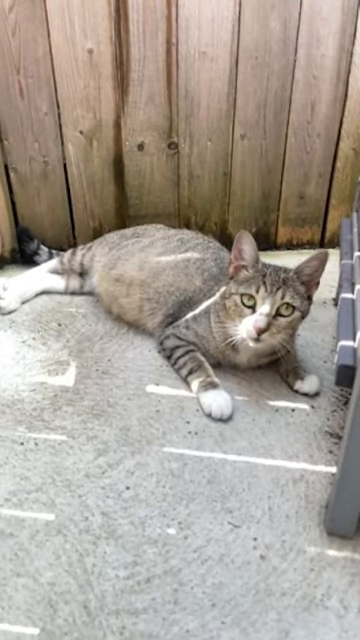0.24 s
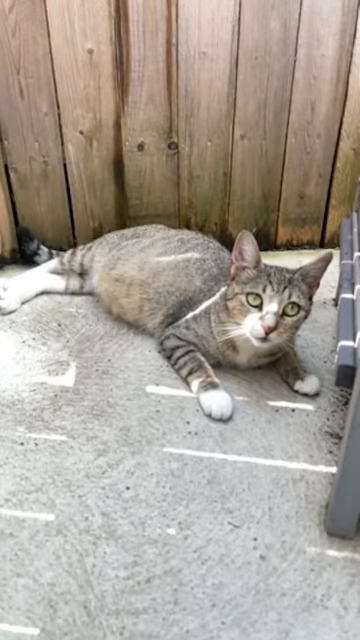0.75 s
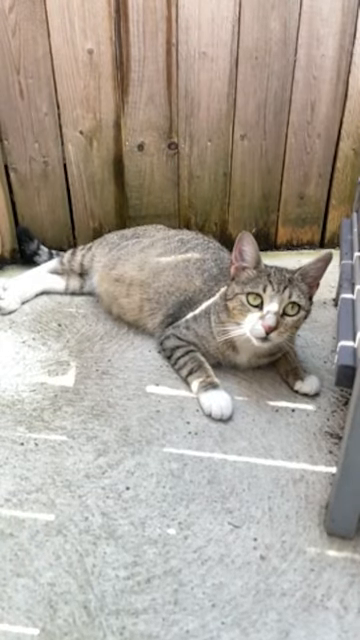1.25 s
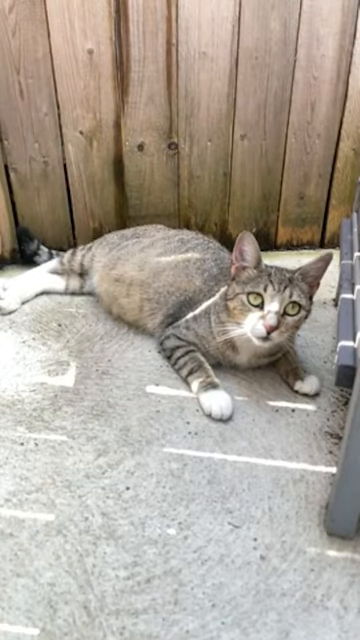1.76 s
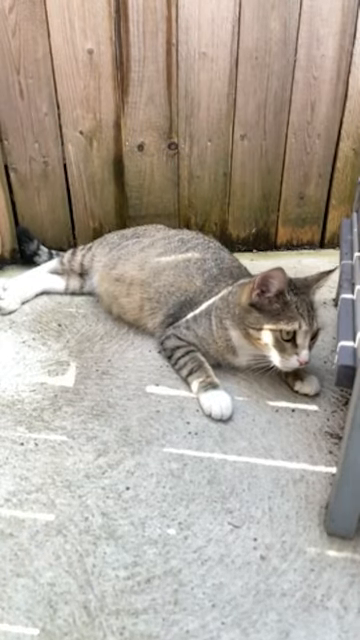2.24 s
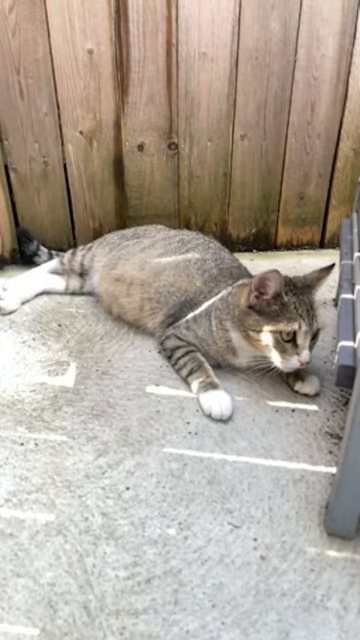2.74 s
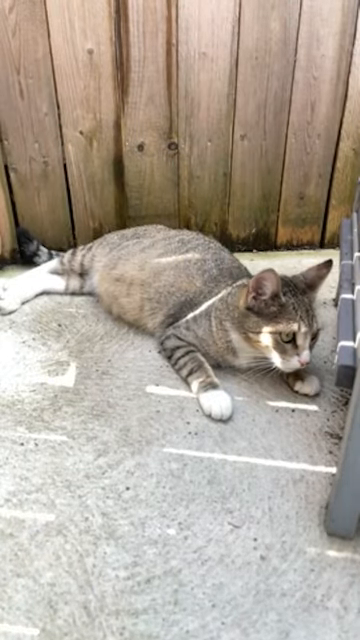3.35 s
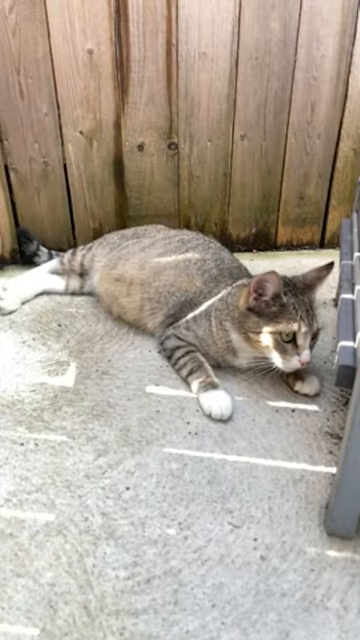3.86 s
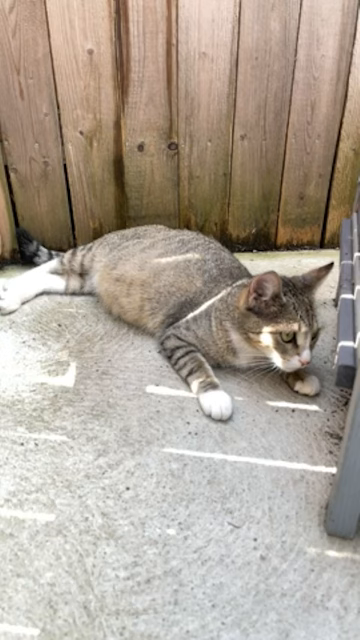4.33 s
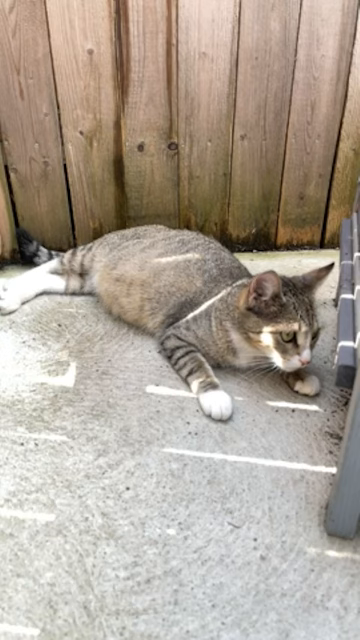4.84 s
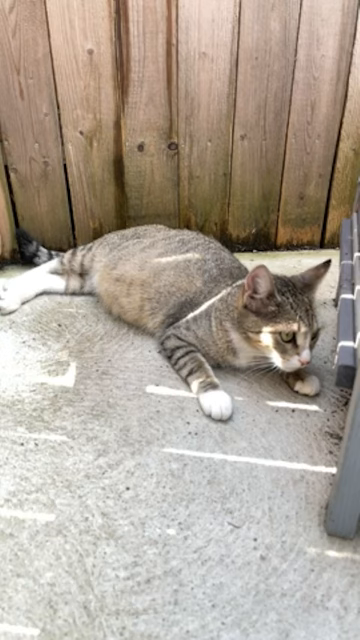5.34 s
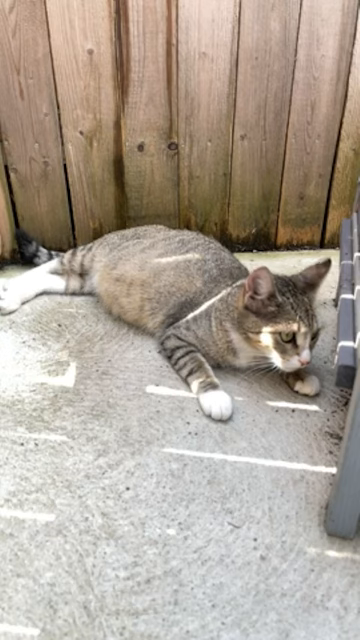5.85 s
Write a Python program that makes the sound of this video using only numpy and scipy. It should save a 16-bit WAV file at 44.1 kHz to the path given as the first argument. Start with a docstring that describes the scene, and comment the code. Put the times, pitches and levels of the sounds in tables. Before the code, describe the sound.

In a backyard, a compressor engine hums steadily while a jackhammer down the street works in three bursts, with fast cracking blows, a thin metallic ring and throbbing puffs of air. During the pause after the first burst, soft brushing, tiny squeaks, light knocks and one dry scratch sound near the microphone. A short second burst follows, and the third runs on to the end, echoing between the houses.

```python
"""What sounds like a jackhammer, a few houses from a backyard microphone, rattles in three bursts:
each blow cracks concrete, rings the steel bit and puffs out air, blurred by walls and fences.
A compressor engine drones on through the pause, over the wash of the neighbourhood.
Close to the microphone: a few soft knocks, light brushing, faint squeaks and a short dry scratch."""
import sys
import numpy as np
from scipy import signal
from scipy.fft import rfft, irfft, next_fast_len
from scipy.io import wavfile

SR = 44100
rng = np.random.default_rng(int(sys.argv[2]) if len(sys.argv) > 2 else 0)


def log_audio(samples):
    """Write samples as a 16-bit WAV file to the path given in sys.argv[1]."""
    # one column per channel
    frames = np.atleast_2d(samples).T
    # limit to full scale, then quantise
    limited = np.clip(frames, -1, 1)
    pcm = np.round(limited * 32767).astype(np.int16)
    wavfile.write(sys.argv[1], SR, pcm)


N = 268569
TIME = np.arange(N) / SR


def gain_of(db):
    """Decibels to amplitude."""
    return 10 ** (np.asarray(db) / 20)


def unit_rms(x):
    """Scales to rms 1."""
    return x / np.sqrt(np.mean(x ** 2) + 1e-20)


def at_hz(points, hz):
    """Reads a table on a log-frequency axis."""
    f, value = np.transpose(points)
    return np.interp(np.log(hz + 1), np.log(f + 1), value)


def curves(rows):
    """The columns of a time table, one value a sample."""
    s, *columns = np.transpose(rows)
    return [np.interp(TIME, s, c) for c in columns]


def add(mix, s, sound):
    """Mixes a sound in at time s."""
    part = mix[round(s * SR):][:len(sound)]
    part += sound[:len(part)]


def coloured(x, spectrum):
    """Filters x by a spectrum table, to rms 1."""
    hz = np.fft.rfftfreq(len(x), 1 / SR)
    return unit_rms(irfft(rfft(x) * gain_of(at_hz(spectrum, hz)), len(x)))


def wander(per_s):
    """Random drift of rms 1, up to about the given rate."""
    size = next_fast_len(N)
    hz = np.fft.rfftfreq(size, 1 / SR)
    lowpass = (hz > 0) * np.exp(-(hz / per_s) ** 2)
    return unit_rms(irfft(rfft(rng.standard_normal(size)) * lowpass, size)[:N])


def tone(hz, db, waver_db):
    """One low tone, wavering on its way through the air."""
    return gain_of(db + waver_db * wander(3.4)) * unit_rms(np.sin(2 * np.pi * np.cumsum(hz) / SR))


# Open air all round the backyard: f/Hz, relative level/dB
AIR_COLOUR = [(60, -41), (125, -7), (160, -8), (220, -7), (320, -12.3), (450, -18.5), (560, -21),
              (800, -26), (1050, -25.6), (1900, -30), (2700, -34.8), (5000, -37), (6000, -40),
              (7500, -38.5), (8000, -49.5), (9400, -54), (10500, -60), (15500, -52)]
def air(level_db=-47, swell_db=0.4):
    """The wash of the neighbourhood, gently swelling."""
    return gain_of(level_db - swell_db * wander(1.16)) * coloured(rng.standard_normal(N), AIR_COLOUR)


# Engine rumble from the road: f/Hz, relative level/dB
RUMBLE_COLOUR = [(20, -50), (28, -31), (36, -5.5), (50, 3), (75, -2), (115, 0), (160, -9.5), (300, -50)]
# Its firing note: t/s, f/Hz, level/dB before trim
FIRING = [(0, 56, -37), (.9, 54, -37), (1.05, 53, -45), (1.75, 55, -45), (1.9, 56.2, -36), (2.3, 57.3, -38),
          (2.8, 57, -37.5), (3.2, 55.8, -40), (3.95, 56, -37), (4.12, 57.2, -30.5), (4.6, 55.6, -37),
          (5.3, 56, -40), (5.55, 55.5, -36), (6.09, 55.5, -37)]
def compressor(rumble_db=-47, firing_trim_db=-3.2, drone_hz=100.3, drone_db=-45.2, stray_hz=.4):
    """The engine's firing note and a steady drone over a low rumble."""
    rumble = gain_of(rumble_db) * coloured(rng.standard_normal(N), RUMBLE_COLOUR)
    firing_hz, firing_db = curves(FIRING)
    drone = tone(drone_hz + stray_hz * wander(1), drone_db, waver_db=1.2)
    return tone(firing_hz, firing_db + firing_trim_db, waver_db=1.5) + drone + rumble


# Light brushing near the microphone: middle t/s, length/s, level/dB
BRUSH_STROKES = [(1.37, 0.24, -58.5), (1.42, .05, -56), (2.24, .4, -61.5), (2.485, .1, -55.5),
                 (2.765, .04, -59)]
# Its hiss: f/Hz, relative level/dB
BRUSH_COLOUR = [(1000, -10), (3300, 3), (5000, 1), (9000, -8), (11500, -8), (13500, -2), (15500, -3)]
def brushing(grain_db=2):
    """Soft, fine-grained rustles that swell and fade."""
    out = np.zeros(N)
    for s, length, db in BRUSH_STROKES:
        size = round(length * SR)
        grains = rng.standard_normal(size) * gain_of(grain_db * wander(300)[:size])
        add(out, s - length / 2, gain_of(db) * coloured(grains, BRUSH_COLOUR) * np.hanning(size))
    return out


# Faint rubs near the microphone: t/s, length/s, starting f/Hz, level/dB
RUBS = [(1.335, .05, 900, -55), (1.365, .07, 1750, -57), (1.418, .02, 3300, -53), (1.445, .04, 1350, -52),
        (1.445, .035, 2550, -52)]
def squeaks(rise_hz_per_s=13000, width_hz=420):
    """Friction in a narrow resonance that slides upward."""
    out, r = np.zeros(N), np.exp(-np.pi * width_hz / SR)
    for s, length, hz, db in RUBS:
        t = np.arange(0, length, 1 / SR)
        fuzz = signal.lfilter([1], [1, -2 * r, r * r], rng.standard_normal(SR // 5))[-len(t):]
        glide = np.sin(2 * np.pi * np.cumsum(hz + rise_hz_per_s * t) / SR)
        add(out, s, gain_of(db) * unit_rms(fuzz * glide) * np.hanning(len(t)))
    return out


def scuff(decay_s, colour, attack_s=.00034):
    """A short dying burst of friction."""
    t = np.arange(SR // 5) / SR
    noise = coloured(rng.standard_normal(len(t)), colour)
    return noise * np.exp(-t / decay_s) * (1 - np.exp(-t / attack_s))


# Knocks at close range: t/s, level/dB, decay/s, body share/dB, body pitch factor, tilt/(dB per octave)
KNOCKS = [(1.406, -57, .04, -25, 1, 0), (1.423, -53, 0.018, -16, 0.72, 0), (1.447, -51, 0.014, -20, 1, 0),
          (1.468, -43.5, 0.0078, -19, 0.92, 0), (1.836, -44.5, 0.01, -5, 1, 3.2),
          (1.84, -56, .005, 8, 1.06, 0), (1.8445, -51, 0.0073, 10, 0.95, -1.5),
          (2.046, -52, .008, 18, .9, -8), (2.053, -45.5, 0.013, -5, 0.97, 3),
          (2.762, -55, 0.018, -14, 1, 0)]
# Their contact noise: f/Hz, relative level/dB
KNOCK_COLOUR = [(200, 2), (700, -8), (1300, 0), (2700, 2), (4500, -9), (7000, -14), (10000, -25),
                (15000, -19)]
# The knocked body before pitch factor and tilt: f/Hz, relative level/dB, t60/s
KNOCK_MODES = [(332, 2.5, 0.07), (540, -0.5, 0.05), (752, 4, 0.044), (2600, -8, 0.043), (3100, -8, .05)]
def knocks():
    """Each soft contact scuffs and leaves a short hollow ring."""
    out, t = np.zeros(N), np.arange(SR // 5) / SR
    for s, db, decay_s, share_db, pitch, tilt_db in KNOCKS:
        body = np.zeros(len(t))
        for hz, mode_db, t60 in KNOCK_MODES:
            octaves = np.log2(hz / KNOCK_MODES[0][0])
            envelope = gain_of(mode_db + tilt_db * octaves - 60 * t / t60)
            body += envelope * np.sin(2 * np.pi * hz * pitch * t)
        add(out, s, gain_of(db) * (scuff(decay_s, KNOCK_COLOUR) + gain_of(share_db) * body))
    return out


# Catches of a scratch at close range: t/s, tick level/dB, ring level/dB, body level/dB, tick decay/s
CATCHES = [(2.44, -53, -57, -60, .003), (2.449, -47, -52, -60, .002), (2.4635, -42, -38, -56, .002),
           (2.469, -49, -48, -51, .003), (2.475, -40, -48, -51, .002), (2.479, -43, -56, -49, .0024),
           (2.4817, -42, -37, -49, .0016), (2.489, -51, -52, -56, .003), (2.495, -52, -47, -60, .007),
           (2.5127, -39, -55, -56, .002), (2.5145, -39, -48, -49, .003)]
# Their dry tick, bright ring and hollow body, each: f/Hz, relative level/dB
TICK_COLOUR = [(400, -15), (780, -2), (1700, -6), (2700, -11), (4500, -10), (6200, -6), (7400, -2),
               (8400, -17), (9900, -6), (11000, -9), (12500, -5), (15000, -4)]
SCRATCH_MODES = [(3150, -6), (3400, 0), (3720, -2)]
HOLLOW_COLOUR = [(400, -20), (650, 0), (790, 6), (1000, -12), (1210, 3), (1500, -14), (3000, -35)]
def scratch(detune=.015, attack_s=.0006, ring_extra_s=.0006, body_decay_s=.007):
    """Each catch ticks, rings briefly and stirs a hollow body."""
    out, t = np.zeros(N), np.arange(SR // 5) / SR
    for s, tick_db, ring_db, body_db, decay_s in CATCHES:
        ring = sum(gain_of(db) * np.sin(2 * np.pi * hz * (1 + detune * rng.standard_normal()) * t)
                   for hz, db in SCRATCH_MODES)
        ring *= np.exp(-t / (decay_s + ring_extra_s)) * (1 - np.exp(-t / attack_s))
        tick = gain_of(tick_db) * scuff(decay_s, TICK_COLOUR)
        body = gain_of(body_db) * scuff(body_decay_s, HOLLOW_COLOUR)
        add(out, s, tick + gain_of(ring_db) * ring + body)
    return out


# Reverberation of the streets and yards between hammer and microphone: f/Hz, t60/s
YARD_DECAY = [(60, 1), (300, 0.92), (1500, 1), (5000, 1), (14000, 0.51)]
def echo_path(x, early_gain, early_s):
    """A first cluster of echoes from nearby walls, then a long diffuse tail."""
    hz, t, bins = signal.stft(rng.standard_normal(SR // 2), SR, nperseg=256)
    fade = gain_of(-60 * t / at_hz(YARD_DECAY, hz)[:, None])
    tail = signal.istft(bins * fade, SR, nperseg=256)[1]
    early = rng.standard_normal(len(tail)) * np.exp(-np.arange(len(tail)) / SR / early_s)
    under_way = np.r_[x[:SR], x]  # a second of lead-in: the yards already ring at the start
    return signal.fftconvolve(under_way, unit_rms(tail) + early_gain * unit_rms(early))[SR:SR + N]


def yards(x, early_gain, early_s, drift_per_s=0.7, paths=4):
    """Moving air slowly shifts the sound from one set of echo paths to the next."""
    turn = drift_per_s * TIME + rng.random()
    shares = [np.maximum(np.cos(2 * np.pi * (turn + k / paths)), 0) for k in range(paths)]
    return sum(share * echo_path(x, early_gain, early_s) for share in shares)


# Boom between the houses: t/s, level/dB
BOOM_LEVEL = [(0, -39), (.5, -38), (.7, -45), (1.05, -41), (1.5, -46), (1.75, -62), (4, -62), (4.7, -47),
              (5.1, -43.5), (6.09, -43.5)]
def boom(hz=71.5, stray_hz=1.5):
    """A low tone that swells while the hammer works."""
    db, = curves(BOOM_LEVEL)
    return tone(hz + stray_hz * wander(8), db, waver_db=1.2)


# Exhaust tones reaching the backyard: multiple of the blow rate, relative level/dB
EXHAUST_HARMONICS = [(2, -21), (5, -7), (7, -7.5), (9, -12), (11, -14), (12, -10.5), (15, -16), (26, -20),
                     (28, -24)]
def throb(cycles, waver_db=2):
    """The regular part of the exhaust: clean multiples of the blow rate."""
    out = np.zeros(N)
    for order, db in EXHAUST_HARMONICS:
        waver = gain_of(waver_db * wander(2))
        out += gain_of(db) * unit_rms(waver * np.sin(2 * np.pi * (order * cycles + rng.random())))
    return out


# The bit shifting in its hole in the road: middle t/s, length/s, mode f/Hz, boost/dB
BIT_SHIFTS = [(.05, .1, 4850, 5), (.26, .12, 4850, 10), (.55, .35, 4850, 5), (1.03, .4, 4850, 7),
              (.7, .12, 5804, 10), (.85, .6, 9875, 6), (.93, .25, 3172, 8.5), (.95, .3, 4285, 7),
              (.7, .5, 13775, -3), (1.06, .13, 13775, 10), (1.06, .13, 8520, 8), (3.66, .2, 6235, -4),
              (3.86, .16, 4850, 6), (3.67, .18, 14348, 3), (3.67, .18, 13775, 4), (3.67, .18, 8520, 4),
              (4.15, .34, 6235, 9.5), (4.08, .1, 15100, 10), (4.22, .18, 4850, 5), (4.22, .22, 13775, 3),
              (4.22, .22, 9875, 3), (4.5, .3, 11050, -7), (4.88, .11, 4850, 2), (5.09, .56, 4850, 8.5),
              (4.86, .1, 14348, 6), (5.02, .12, 13775, 6), (5.64, .26, 4850, 6.5), (5.71, .1, 13775, 9),
              (5.75, .3, 6235, 4), (5.9, .26, 9875, 7), (5.86, .18, 8520, 6), (5.92, .3, 3172, 7),
              (6.01, .1, 5804, 9)]
def shift_gain(mode_hz):
    """As the bit shifts, one mode sings out or is held back for a moment."""
    return gain_of(sum(db / (1 + (2 * (TIME - s) / length) ** 6)  # a flat-topped swell
                       for s, length, hz, db in BIT_SHIFTS if hz == mode_hz))


def resonance(drive, hz, width_hz):
    """One lightly damped mode, kept sounding by the drive."""
    r = np.exp(-np.pi * width_hz / SR)
    return unit_rms(signal.lfilter([1, 0, -1], [1, -2 * r * np.cos(2 * np.pi * hz / SR), r * r], drive))


# The bit's weaker modes, heard from the backyard: f/Hz, level/dB before swells and burst gain
BIT_MODES = [(3172, -68), (4285, -65.5), (4960, -67), (5804, -67), (6235, -62.5), (8520, -72),
             (9875, -68.5), (11050, -72.5), (13775, -69.5), (14348, -67), (15100, -81)]
def steel_bit(drive, swell_db=1.4, singing_hz=4850, singing_db=-61, stray_hz=11, spurt_db=2.4):
    """Each mode of the steel swells and fades on its own; the strongest sings in spurts."""
    modes = np.zeros(N)
    for hz, db in BIT_MODES:
        swell = unit_rms(gain_of(swell_db * wander(2))) * shift_gain(hz)
        modes += gain_of(db) * swell * resonance(drive, hz, width_hz=25)
    pitch = singing_hz + stray_hz * (wander(15) + wander(90))
    song = unit_rms(np.sin(2 * np.pi * np.cumsum(pitch) / SR) * gain_of(spurt_db * wander(35)))
    return modes + gain_of(singing_db) * shift_gain(singing_hz) * song


# Trigger pulls out on the road: on t/s, off t/s, rise/s, strike level/dB, exhaust level/dB,
# ring gain/dB, treble lift of the first blows/dB
BURSTS = [(-1, 1.12, .19, -43, -40, -1, 0), (3.43, 3.72, .22, -48, -43.5, .5, 9),
          (3.89, 6.2, .21, -41.5, -38.2, 1, 4.5)]
# The hammer is leaned on and strikes harder: middle t/s, length/s, boost/dB
LEANS = [(1.0, .28, 1.7)]
def bursts(bite_s=.38, ring_bite_db=3.5, exhaust_fill_s=.2):
    """Each burst bites brightly, holds and dies away: first the ring, then rattle, then exhaust."""
    lift_db, strike, exhaust, ring = np.zeros((4, N))
    for start, stop, rise_s, strike_db, exhaust_db, ring_db, bite_db in BURSTS:
        age, after = np.maximum(TIME - start, 0), np.maximum(TIME - stop, 0)
        rise = np.sin(np.pi / 2 * np.minimum(age / rise_s, 1)) ** 2
        contact, rattle, airflow = (rise * gain_of(-db_per_s * after) for db_per_s in (85, 51, 44))
        bite = contact * np.exp(-(age / bite_s) ** 2)
        lift_db += bite_db * bite
        strike += gain_of(strike_db) * rattle
        exhaust += gain_of(exhaust_db) * airflow * (1 - np.exp(-age / exhaust_fill_s))
        ring += gain_of(ring_db + ring_bite_db * bite) * rise * contact
    lean_db = sum(db * np.exp(-(2 * (TIME - s) / length) ** 2) for s, length, db in LEANS)
    return lift_db, strike * gain_of(lean_db), exhaust, ring


def brightened(x, db, corner_hz=3400):
    """Lifts the treble by a curve in dB."""
    dull = signal.sosfiltfilt(signal.butter(1, corner_hz, fs=SR, output="sos"), x)
    return dull + gain_of(db) * (x - dull)


# Pace of the hammer, a few houses from the microphone: t/s, blow rate/Hz
BLOW_RATE = [(0, 19.2), (.34, 18.9), (.6, 18), (1.2, 17.7), (3.6, 17.5), (4, 19), (5.07, 19.3),
             (6.09, 18.8)]
# Strike on concrete and exhaust puff at that distance, each: f/Hz, relative level/dB
STRIKE_COLOUR = [(300, -7), (520, 0.5), (780, -3), (970, 1.8), (1250, -1.5), (1800, 1), (2700, -5.2),
                 (3750, -8.6), (5000, -4.8), (5700, -9), (7200, -6.5), (8000, -16), (9700, -18),
                 (10600, -22), (12300, -23), (14200, -18.5), (15500, -22)]
EXHAUST_COLOUR = [(28, -39), (45, -6), (55, -14.5), (72, -3), (82, -2), (93, 2), (130, 4), (165, 0),
                  (197, -2.5), (231, 3), (262, -2), (320, -2.5), (480, -14), (1200, -45)]
def jackhammer(rate_stray=.005, uneven_db=1.1, crumble=0.8, crumble_s=.02, puff=1.3, chatter=0.82):
    """Each blow cracks concrete, rings the steel and lets out a puff of air."""
    rate = curves(BLOW_RATE)[0] * (1 + rate_stray * wander(2))
    lift_db, strike_gain, exhaust_gain, ring_gain = bursts()
    cycles = np.cumsum(rate) / SR
    since_blow = cycles % 1 / rate
    blows = np.diff(np.floor(cycles), prepend=0) * gain_of(uneven_db * rng.standard_normal(N))
    chips = np.exp(-since_blow / crumble_s) * rng.standard_normal(N)
    cracks = yards(unit_rms(blows) + crumble * unit_rms(chips), early_gain=0.045, early_s=0.01)
    puffs = yards(unit_rms(blows) + puff * unit_rms(chips), early_gain=0.24, early_s=0.015)
    strike = brightened(coloured(cracks, STRIKE_COLOUR), lift_db)
    exhaust = coloured(puffs, EXHAUST_COLOUR) + throb(cycles)
    ring = steel_bit(chips + chatter * rng.standard_normal(N))  # the bit chatters on between blows
    return strike_gain * strike + exhaust_gain * exhaust + boom() + ring_gain * ring


def scene():
    """Road work down the street and small sounds close by, at one backyard microphone."""
    return (jackhammer() + compressor() + air() + knocks() + scratch() + brushing() + squeaks())[None]


def record(dry, edge_hz=15800):
    """The recorder's band limit."""
    lowpass = signal.firwin(511, edge_hz, window=("kaiser", 9), fs=SR)
    return signal.oaconvolve(dry, lowpass[None], "same")


dry = scene()
out = record(dry)
log_audio(out)
```